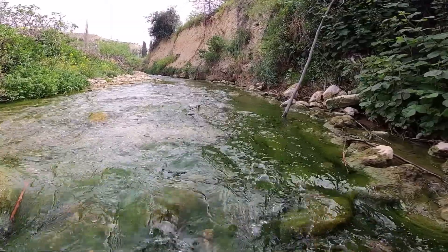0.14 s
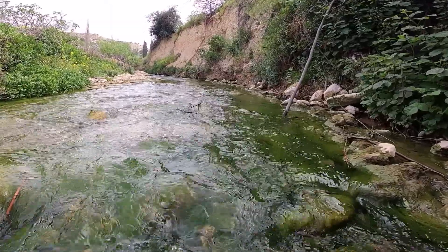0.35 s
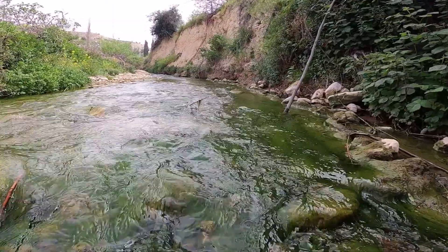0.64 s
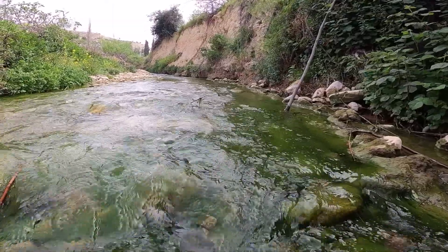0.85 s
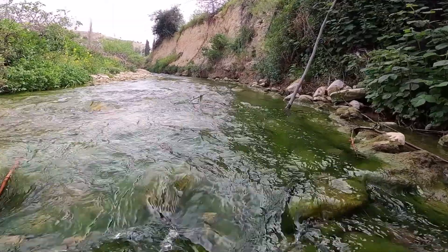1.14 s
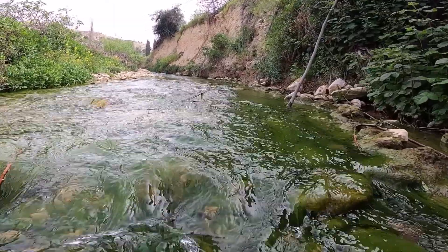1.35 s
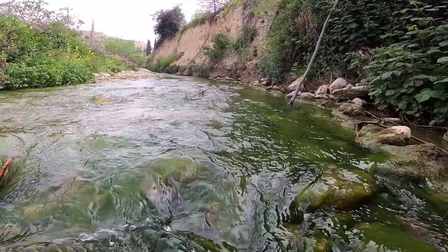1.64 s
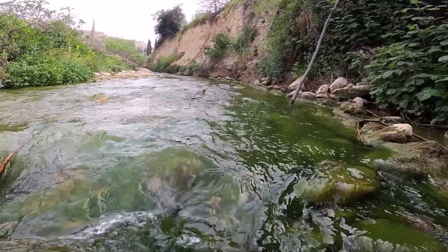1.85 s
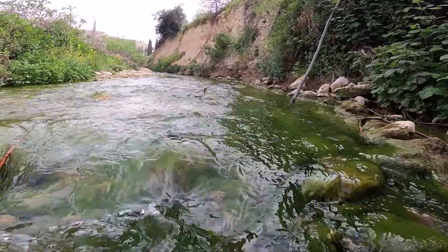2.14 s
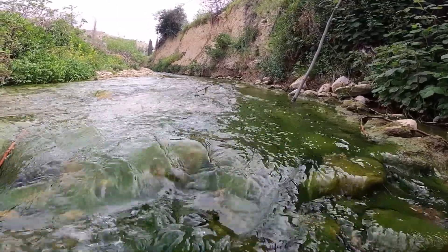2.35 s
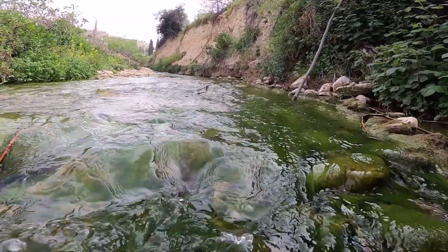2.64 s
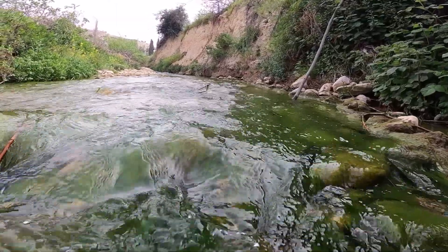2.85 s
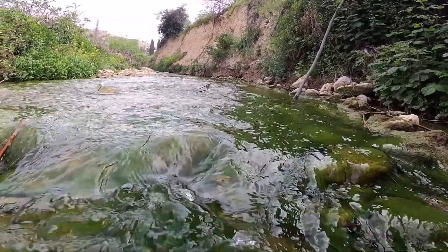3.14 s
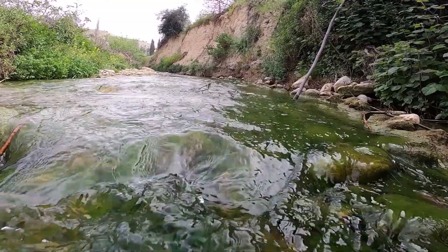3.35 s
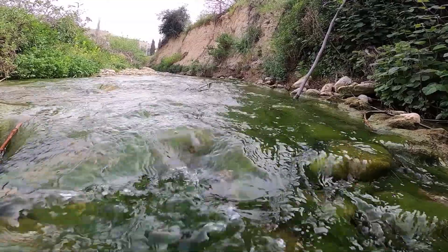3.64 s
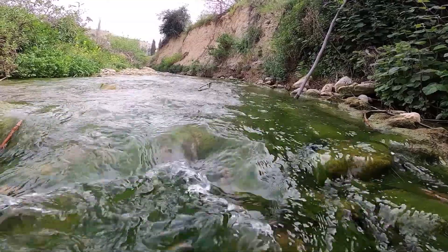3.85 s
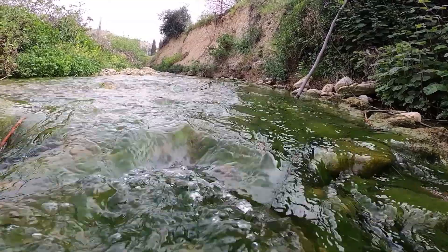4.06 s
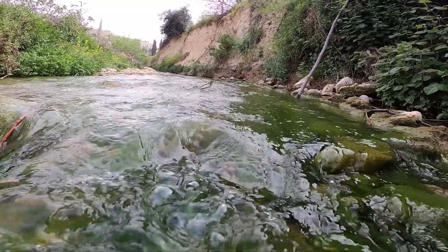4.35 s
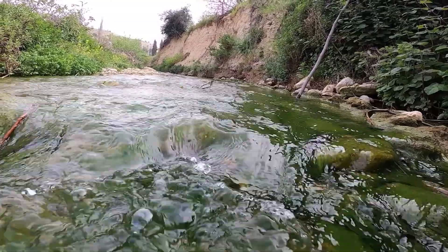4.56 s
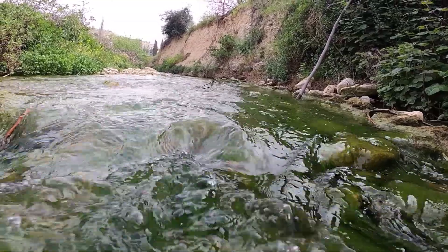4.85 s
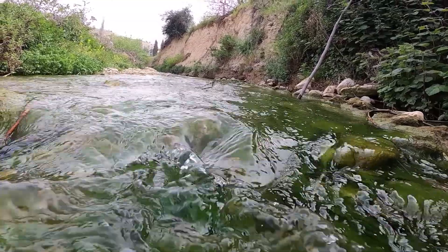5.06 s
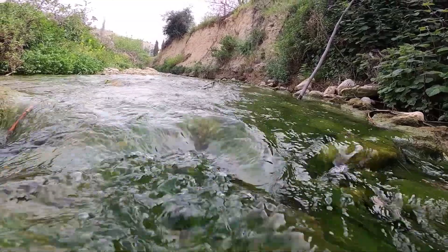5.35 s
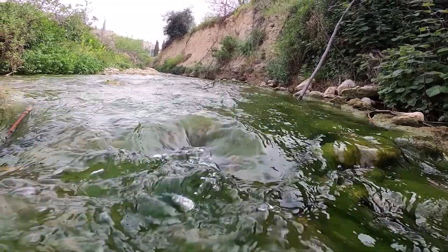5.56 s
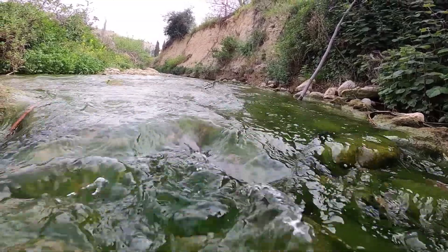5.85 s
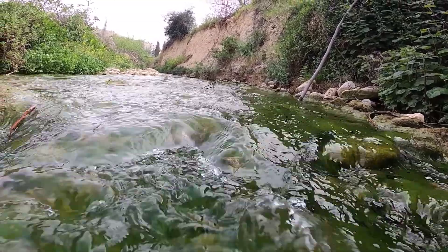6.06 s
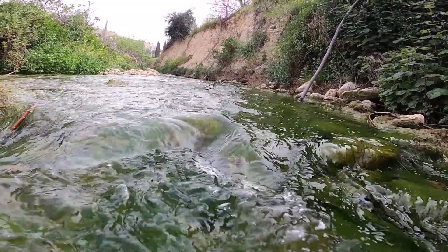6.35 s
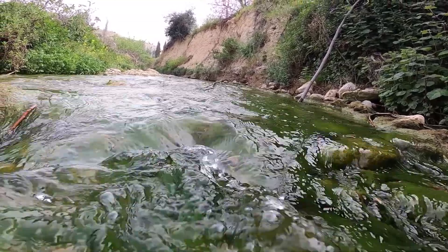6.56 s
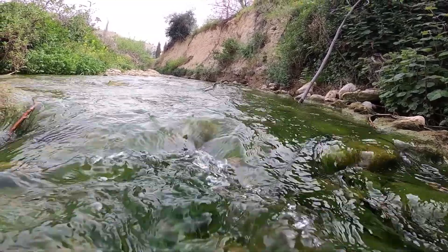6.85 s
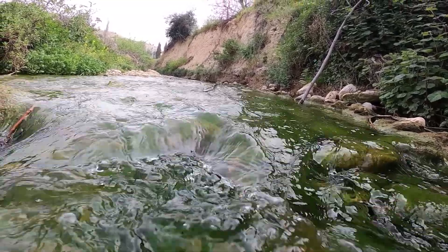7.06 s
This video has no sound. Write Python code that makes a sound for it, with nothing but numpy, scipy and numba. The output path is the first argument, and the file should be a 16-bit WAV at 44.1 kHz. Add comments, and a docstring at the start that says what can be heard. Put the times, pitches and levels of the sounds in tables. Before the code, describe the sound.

Close outdoor sound of a shallow stream rushing over stones, fizzing and bubbling. A frog opens at once with a dozen quick, bright, ratchety chirps. Three rattling croaks follow, the middle one longest, with soft wind thumps around them. After a pause of gurgling water, a slightly lower-pitched frog gives ten more chirps. Then only the stream remains, with plops and barely audible peeps. Stereo, frogs slightly right, very little echo.

```python
"""Beside a shallow stream that runs over stones under an earth bank, marsh frogs call.
Two bouts of sharp chirps, each a quick run of clicks into the vocal sacs, frame three rattling croaks
made of pulse trains that ring sacs and throat. The water is banded noise, ringing bubbles, fizz and drops;
faint gliding peeps, perhaps a far bird, come late, and gusts of low noise thump on the microphone."""
import sys
import numpy as np
from scipy import signal
from scipy.fft import rfft, irfft, next_fast_len
from scipy.io import wavfile
from scipy.ndimage import uniform_filter1d, minimum_filter1d
from numba import njit

SR = 44100
rng = np.random.default_rng(int(sys.argv[2]) if len(sys.argv) > 2 else 0)


def to_wav(s):
    """Save 16-bit WAV."""
    ch = np.atleast_2d(s).T  # columns
    pcm = np.round(np.clip(ch, -1, 1) * 32767)  # PCM
    wavfile.write(sys.argv[1], SR, pcm.astype(np.int16))


N = 318402
TIME = np.arange(N) / SR

# the stream's flow; the rush follows its rise and fall about the median:
# (time [s], rush [dB], spray before trim [dB])
FLOW = [(0.0, -46, -54), (.7, -45, -53), (1.4, -43, -53.5), (2.4, -39, -53), (3.3, -42, -49),
        (4.4, -39.5, -50), (5.1, -39.5, -51.5), (6.2, -42, -56.5), (7.22, -40, -55)]
RUSH_DB = -35.5   # rush and bubbles at median flow, before their own trims
# colour of the rush: (frequency [Hz], density [dB per Hz])
RUSH_COLOUR = [(35, -36), (60, -7.5), (118, -4.5), (206, 2.5), (272, -4.5), (453, -8), (657, -11),
               (976, -9.5), (1070, -7), (1630, -11), (1910, -9), (4850, -22.5), (7540, -23), (12600, -46.5),
               (15500, -55.5)]
# colour of the spray: (frequency [Hz], density [dB per Hz])
SPRAY_COLOUR = [(2000, -6.5), (3500, 6.5), (5000, 2.5), (7500, -0.5), (8400, -9.5), (9300, -8),
                (10200, -11.5), (12500, -13.5), (15500, -36.5)]
# stereo width of the rush: (frequency [Hz], side against mid [dB])
WIDTH = [(60, -15.5), (110, -29.5), (200, -21), (380, -11.5), (700, -9), (1290, -12.5), (2380, -9),
         (4400, -4.5), (8120, -2.5), (15000, 19.5)]
# colour of the wind: (frequency [Hz], density [dB per Hz])
WIND_COLOUR = [(12, -15.5), (20, 6), (50, 7), (90, -1), (225, -18.5), (264, -43), (296, -23), (323, -35.5),
               (400, -44.5), (880, -120)]
# gusts on the microphone: (centre time [s], length [s], level before trim [dB])
GUSTS = [(0.14, 0.24, -45), (0.653, 0.16, -41), (1.344, 0.12, -38), (1.419, 0.043, -20),
         (1.988, 0.11, -18.5), (2.078, 0.11, -31.5), (2.222, 0.042, -21), (2.373, 0.12, -21.5),
         (2.588, 0.038, -30), (2.785, 0.29, -34.5), (2.938, 0.065, -27), (3.053, 0.051, -23),
         (3.308, 0.17, -25.5), (3.48, 0.12, -30), (4.897, 0.14, -40.5), (6.82, 0.14, -30)]
# the light air between gusts, before trim
BREEZE_DB, BREEZE_SWING_DB, BREEZE_SWINGS_PER_S = -45, 2.5, 5.4

# chirps of the first frog: (time of the main click [s], last click spacing [s],
# level of the fifth-last click [dB], wait for the closing click [s], closing level [dB]);
# levels are against the main click, before the effort
FIRST_CHIRPS = [(.0423, .0051, -10, .012, -14), (.1136, .00495, -6, .0087, -5),
                (.1874, .0049, -6, .0076, -7), (.2598, .0052, -8, .0096, -9),
                (.3323, .00515, -7, .0104, -14), (.3995, .0048, -9, .0065, -3),
                (.4746, .0054, -5.5, .0114, -13), (.5439, .00505, -7, .0073, -2),
                (.6133, .00495, -8, .0062, -2), (.6873, .005, -8, .0065, -2),
                (.7604, .00515, -7, .0074, -4), (.8325, .0048, -3.5, .0062, -2)]
# chirps of the second frog: (time of the main click [s], last click spacing [s],
# level of the fifth-last click [dB], wait for the closing click [s], closing level [dB])
SECOND_CHIRPS = [(4.6005, .0039, -5, .0053, -2), (4.6627, .00475, -4, .0086, -3),
                 (4.7339, .00465, -5, .0079, -1), (4.8055, .00435, -9, .0052, -2),
                 (4.8801, .00485, -7.5, .0095, -6), (4.9557, .0049, -7.5, .0086, -5),
                 (5.0264, .00465, -10, .0062, -3), (5.1026, .00485, -9, .0081, -4),
                 (5.176, .0047, -10, .0059, -1), (5.2558, .00525, -5, .0162, -16)]
# lone clicks that end each bout: (time [s], level against a main click before the effort [dB])
FIRST_END = [(0.852, -9)]
SECOND_END = [(5.295, -19), (5.306, -16)]
# the sacs tighten through a bout and slacken at its end:
# (time [s], sac pitch [Hz], bandwidth [Hz], effort [dB])
FIRST_SAC = [(.04, 2630, 470, -1.5), (.26, 2830, 337, -0.5), (.47, 2895, 280, 0.5), (.62, 2915, 268, 0),
             (.76, 2930, 292, 1.5), (.83, 2580, 573, -1), (.85, 2380, 500, 1.5)]
SECOND_SAC = [(4.6, 2240, 210, -1), (4.66, 2340, 220, -1), (4.73, 2390, 190, 0.5), (4.86, 2586, 130, 1.5),
              (5.03, 2640, 125, 3), (5.1, 2640, 130, 2.5), (5.18, 2520, 200, 2.5), (5.26, 2360, 280, 2.5),
              (5.31, 2100, 170, 2.5)]
# other resonances of the chirping frogs: (frequency [Hz], bandwidth [Hz], level against the sac [dB])
FIRST_BODY = [(1365, 92, -33), (2055, 280, -19.5), (2590, 1030, -6), (3080, 415, -5), (3900, 110, -26),
              (4450, 140, -30.5), (4912, 126, -12.5), (5064, 185, -11)]
SECOND_BODY = [(697, 86, -27), (1260, 1100, -26.5), (1800, 630, -6.5), (2050, 210, -11.5),
               (2460, 560, -26.5), (4570, 460, -19), (5144, 170, -4.5)]
RING_S, CHOKE_S = 0.0055, 0.0011   # latest middle of the choke after a click, and the choke's length
FAINTEST_CLICK_DB = -24            # floor of the early clicks, before scatter and effort
TAUT_BRIGHT_DB_PER_HZ = 0.0076     # tighter sacs sound brighter
EARLY_BRIGHT_DB = 1.03             # per click: the early clicks of a chirp carry more treble

# wavelets that break on the stones: (centre time [s], length [s], level [dB])
SPLASHES = [(1.045, 0.041, -55), (1.18, .03, -58), (1.585, 0.055, -43), (1.69, .05, -46),
            (2.685, 0.063, -40.5), (2.75, 0.21, -40.5), (2.82, .12, -42)]
# colour of a splash: (frequency [Hz], density [dB per Hz])
SPLASH_COLOUR = [(800, -25), (2500, -0.5), (3800, 4.5), (5500, -2), (7600, -4.5), (9000, -7), (12000, -15),
                 (15000, -28)]
# drops that spit off the riffle: (time [s], peak before trim [dB], pitch [Hz])
DROPS = [(1.3224, -39, 9100), (1.596, -29, 4600), (1.598, -37, 9300), (2.224, -25, 5160),
         (2.614, -31, 4760), (2.707, -23, 4900), (2.715, -20, 4200), (2.721, -25, 3405),
         (3.1747, -33, 7300), (4.1894, -37, 4620), (4.408, -35, 4400), (4.719, -27, 5070),
         (6.4014, -36, 6960), (6.797, -20, 1800)]

# three croaks, each one train of pulses that surges with every push of air:
# (time [s], rate [pulses per s], level before trim [dB])
CROAKS = [
    [(1.76, 450, -44), (1.778, 466, -36.5), (1.815, 503, -26.5), (1.828, 510, -29), (1.838, 610, -25.5),
     (1.845, 470, -24), (1.857, 427, -27), (1.866, 550, -22), (1.877, 560, -19.5), (1.884, 345, -19),
     (1.893, 345, -21.5), (1.905, 397, -16.5), (1.917, 480, -9), (1.924, 430, -13), (1.931, 374, -19),
     (1.939, 303, -17.5), (1.95, 390, -9.5), (1.957, 310, -17.5), (1.97, 310, -23.5), (1.98, 330, -38)],
    [(2.148, 272, -35), (2.178, 285, -23.5), (2.198, 280, -23), (2.213, 237, -21.5), (2.235, 304, -22.5),
     (2.254, 220, -26), (2.274, 355, -21.5), (2.286, 270, -18.5), (2.296, 270, -26.5), (2.32, 335, -16),
     (2.331, 385, -20), (2.348, 300, -27.5), (2.363, 375, -16), (2.376, 295, -18.5), (2.39, 278, -28),
     (2.408, 377, -15.5), (2.43, 294, -21), (2.445, 362, -17), (2.457, 360, -6), (2.472, 270, -32),
     (2.486, 323, -10.5), (2.499, 286, -22), (2.505, 400, -15.5), (2.516, 230, -49)],
    [(2.82, 380, -36), (2.844, 385, -31), (2.857, 330, -26.5), (2.871, 350, -21.5), (2.888, 280, -32),
     (2.905, 364, -22.5), (2.915, 320, -27), (2.925, 250, -35), (2.937, 310, -28), (2.945, 340, -23),
     (2.955, 290, -24), (2.968, 217, -37), (2.98, 304, -22), (2.988, 356, -15.5), (2.997, 320, -21),
     (3.013, 245, -34), (3.026, 345, -19.5), (3.035, 370, -10.5), (3.046, 340, -17), (3.058, 285, -39)],
]
# the sacs slacken in the middle of each croak and fill again:
# (time [s], sac pitch [Hz], bandwidth [Hz], throat level [dB])
CROAK_SACS = [
    [(1.78, 1800, 160, 2), (1.82, 1968, 160, 2), (1.85, 1388, 300, 0), (1.88, 1630, 300, 1.5),
     (1.915, 1808, 101, -6), (1.95, 2007, 110, -6.5)],
    [(2.16, 2000, 120, -10), (2.205, 2090, 120, -9.5), (2.235, 1844, 220, -2), (2.26, 1400, 129, -4),
     (2.285, 1380, 150, -6), (2.305, 1674, 200, -10), (2.33, 1450, 280, -1), (2.37, 1403, 330, 2),
     (2.415, 1414, 250, 2), (2.447, 1814, 110, -3.5), (2.49, 1990, 110, -2)],
    [(2.83, 1598, 160, -1), (2.87, 1730, 120, -3), (2.905, 1390, 280, 1), (2.945, 1000, 380, 1),
     (2.99, 1430, 280, 0), (3.036, 1780, 160, -1)],
]
# throat of the croaking frog: (frequency [Hz], bandwidth [Hz], level against the sac before throat level [dB])
THROAT = [(580, 165, -10), (1017, 190, -10.5), (1452, 57, -17), (1890, 50, -17), (2160, 480, -39),
          (2780, 600, -21.5)]
# thin upper resonances that swell and glide over the croaks:
# (bandwidth [Hz], glide of (time [s], frequency [Hz], level against the voice [dB]))
OVERTONES = [(330, [(2.15, 3930, -25), (2.235, 3950, -16), (2.29, 4230, -17), (2.32, 4100, -10),
             (2.365, 4000, -10), (2.42, 4100, -14), (2.44, 4100, -45)]), (120, [(2.33, 5500, -40),
             (2.36, 5350, -28), (2.41, 5140, -25), (2.45, 5000, -36), (2.5, 4850, -33)]),
             (100, [(2.99, 4920, -36), (3.015, 4990, -14), (3.035, 4930, -22), (3.05, 4830, -30)])]
# added unevenness of the pulse rate while the sacs are slack, one per croak: (share of the rate [1])
SLACK_JITTERS = [.028, .045, .012]
# rasp while the sacs are slack, one per croak: (level against the voice [dB])
SLACK_RASPS_DB = [-21, -17, -23.5]
TAUT_RASP_DB = -22
TAUT_HZ, SLACK_HZ = 1696, 1670             # taut sacs sound pure, slack ones rough
RASP_HZ, RASP_WIDTH_HZ = 2720, 630         # the edge of each pulse
TAUT_FLUTTER, SLACK_FLUTTER = .015, .028   # turbulence that trails each pulse

# glugs and plops: (time [s], peak before trim [dB], starting pitch [Hz])
GURGLES = [(3.513, -25, 1120), (3.58, -30.5, 172), (3.621, -28.5, 980), (3.722, -25.5, 2200),
           (3.834, -24.5, 2360), (3.88, -27.5, 198), (3.934, -27.5, 940), (4.031, -28, 200),
           (4.385, -21.5, 2050), (4.468, -29, 162), (4.918, -19, 2060), (5.69, -30.5, 317),
           (5.941, -31, 980), (6.0, -31, 362), (6.025, -29, 1400), (6.055, -27.5, 775), (6.276, -32, 666),
           (6.561, -27, 174), (6.563, -27, 1270), (6.659, -30, 167), (6.849, -22.5, 1380),
           (7.105, -31, 185)]
# faint peeps, perhaps a far bird:
# (centre time [s], length at half height [s], peak [dB], centre pitch [Hz], glide [Hz per s])
PEEPS = [(5.855, .025, -48, 3320, 5996), (5.892, 0.011, -35.5, 2600, 0), (6.112, 0.027, -40, 2890, -12000)]
# echoes off water, stones and bank: (delay [s], level [dB])
ECHOES = [(.0023, -14.5), (.0038, -21.5), (.0093, -24)]


def from_db(db):
    """Decibels to gain."""
    return 10 ** (np.asarray(db) / 20)


def rms_one(x):
    """Scale to unit power."""
    return x / np.sqrt(np.mean(x ** 2) + 1e-20)


def in_time(rows):
    """The columns of a curve at every sample."""
    s, *columns = np.transpose(rows)
    return [np.interp(TIME, s, c) for c in columns]


def at_hz(points, hz):
    """Read a spectrum on a log-frequency axis."""
    f, values = np.transpose(points)
    return np.interp(np.log(hz + 1e-3), np.log(f + 1e-3), values)


def drift(rate):
    """Slow chance with spread 1, at about this many swings per second."""
    knots = rng.standard_normal(int(N / SR * rate * 2) + 2)
    return rms_one(np.interp(TIME * rate * 2, np.arange(len(knots)), knots))


def cut(x, hz, kind, order=2):
    """Butterworth filter."""
    sos = signal.butter(order, np.minimum(hz, .45 * SR), kind, fs=SR, output="sos")
    return signal.sosfilt(sos, x)


def coloured(x, spectrum):
    """Give a noise a spectrum; rms 1."""
    size = next_fast_len(N)
    gain = from_db(at_hz(spectrum, np.fft.rfftfreq(size, 1 / SR)))
    return rms_one(irfft(rfft(x, size) * gain, size)[..., :N])


def add(track, s, sound):
    """Mix a sound into a track from time s on."""
    at = round(s * SR)
    part = sound[max(-at, 0):N - at]
    track[max(at, 0):max(at, 0) + len(part)] += part


def swells(rows):
    """Gain of bell-shaped swells, given as (centre time [s], length [s], level [dB])."""
    return sum(from_db(db) * np.exp(-(2 * (TIME - s) / length) ** 2) for s, length, db in rows)


def ring(clicks, hz, width_hz):
    """A resonance: a unit click starts a dying wave of height 1."""
    r, w = np.exp(-np.pi * abs(width_hz) / SR), 2 * np.pi * hz / SR
    return signal.lfilter([.5, 0, -.5], [1, -2 * r * np.cos(w), r * r], clicks + 1e-18)


@njit
def gliding_ring(clicks, hz, width_hz):
    """A resonance whose pitch and width move from sample to sample."""
    out, state = np.zeros(len(clicks)), 0j
    for i in range(len(clicks)):
        state = state * np.exp(np.pi * (2j * hz[i] - abs(width_hz[i])) / SR) + clicks[i]
        out[i] = state.real
    return out


def evened(x, size=260):
    """Hold a pulsed sound near rms 1 over a few pulses."""
    power = uniform_filter1d(uniform_filter1d(x ** 2, size=size), size=size)
    return x / np.sqrt(np.abs(power) + 1e-6)


def rush(patchy_db=1.3, count=20):
    """Countless far bubbles merge into bands of noise that flicker each on its own."""
    out, edges = 0, np.geomspace(90, 15500, count + 1)
    white = rng.standard_normal((2, 2, N))
    for k, (low, high) in enumerate(zip(edges, edges[1:])):
        mid, side = cut(white[k % 2], [low, high], "band")
        hz = np.sqrt(low * high)
        gain = from_db(at_hz(RUSH_COLOUR, hz) + patchy_db * drift(14))
        out = out + gain * (mid + from_db(at_hz(WIDTH, hz)) * side * [[1], [-1]])
    return out / np.std(out.mean(axis=0))


def bubbles(low_hz=170, high_hz=3200, cycles=20, rise=.1, spread_db=2.7, swell_db=2.6, count=2800):
    """Near bubbles ring for some cycles and rise in pitch as they reach the surface; they come in swells."""
    out = np.zeros((2, N))
    for when, size, strength, where in rng.random((count, 4)):
        hz = low_hz * (high_hz / low_hz) ** np.sqrt(size)
        age = np.arange(0, 1, hz / (cycles * SR))   # 0 at birth, 1 when 60 dB down
        level_db = spread_db * min(-np.log(strength + 1e-9), 4) + at_hz(RUSH_COLOUR, hz)
        height = from_db(level_db) * np.sqrt(hz)
        wave = height * from_db(-60 * age) * np.sin(2 * np.pi * cycles * age * (1 + rise * age))
        add(out[0], when * N / SR + (where - .5) * 0.00037, wave)   # a small lag sets its place
        add(out[1], when * N / SR, wave)
    return rms_one(out * from_db(swell_db * drift(5)))


def spray(per_s, grain_db, hiss):
    """Tiny bursting bubbles fizz over the riffle: random grains and hiss, partly shared between sides."""
    sizes = from_db(grain_db * np.minimum(rng.exponential(1, (2, N)), 4))
    grains = (rng.random((2, N)) < per_s / SR) * sizes
    fizz = rms_one(grains * rng.choice([-1, 1], (2, N))) + hiss * rng.standard_normal((2, N))
    return coloured(fizz + 0.34 * fizz[::-1], SPRAY_COLOUR)


def stream(rush_db=-1.5, bubble_db=-5, spray_db=-1, surge=0.7, spray_swing_db=1.0):
    """Rush and bubbles swell together with the flow; spray and splashes come and go above them."""
    flow_db, fizz_db = in_time(FLOW)
    water = from_db(rush_db) * rush() + from_db(bubble_db) * bubbles()
    water = cut(water, 6170, "low") * from_db(RUSH_DB + surge * (flow_db - np.median(flow_db)))
    fizz_gain = from_db(fizz_db + spray_db + spray_swing_db * drift(9))
    fizz = fizz_gain * spray(per_s=1500, grain_db=4.0, hiss=1.0)
    return water + fizz + splashes() + drops() + gurgles()


def wind(shared=.08, pan_db=1.0, level_db=2.2):
    """Eddies buffet each port, partly on their own; gusts swell and die over a restless breeze."""
    eddies = rng.standard_normal((2, N))
    rumble = cut(coloured(eddies + shared * eddies[::-1], WIND_COLOUR), 550, "low", order=4)
    power = uniform_filter1d(np.mean(rumble ** 2, axis=0), size=4000)
    steady = rumble / np.sqrt(np.abs(power) + 1e-9)
    breeze = from_db(BREEZE_DB + BREEZE_SWING_DB * drift(BREEZE_SWINGS_PER_S))
    return steady * (breeze + swells(GUSTS)) * from_db(level_db) * from_db([[pan_db], [0]])


def chirps(notes, ends, sac, body, tighten, top_hz, swell, count=9):
    """Clicks that swell and slow down, then a late closing click, ring a sac that is choked each time."""
    out, unit = np.zeros(N), signal.unit_impulse(SR // 100)
    back = np.arange(count)   # clicks counted back from the main one
    age = TIME[:len(unit)]
    # neighbouring modes swing against each other, so a click takes a cycle or two to build up
    modes = np.array([(-1) ** k * from_db(db) * ring(unit, hz, w) for k, (hz, w, db) in enumerate(body)])
    high = np.array(body)[:, 0] > 4300
    low_modes, high_modes = modes[~high].sum(axis=0), modes[high].sum(axis=0)
    sac_s, sac_hz, sac_width, effort_db = np.transpose(sac)

    clicks = [(s, db, 0, RING_S) for s, db in ends]
    for s, spacing, lead_db, wait, closing_db in notes:
        gaps = spacing * (1 + back) ** -tighten * rng.normal(1, .012, count)
        levels = np.maximum(lead_db * (back / 4) ** swell, FAINTEST_CLICK_DB) + rng.normal(0, .5, count)
        times = s - np.cumsum(gaps) + gaps
        clicks += [*zip(times, levels, back, [wait, *gaps])]
        clicks.append((s + wait, closing_db, 0, RING_S))

    for s, db, early, until_next in clicks:
        hz = np.interp(s, sac_s, sac_hz) * rng.normal(1, .008)
        still_open = np.clip((min(until_next, RING_S) - age) / CHOKE_S + .5, 0, 1)
        choke = np.sin(np.pi / 2 * still_open) ** 2
        treble_db = EARLY_BRIGHT_DB * (early - 5.5) + TAUT_BRIGHT_DB_PER_HZ * (hz - sac_hz.mean())
        sac_ring = ring(unit, hz, np.interp(s, sac_s, sac_width))
        click = choke * (sac_ring + low_modes + from_db(treble_db) * high_modes)
        add(out, s, from_db(db + np.interp(s, sac_s, effort_db)) * click)
    return cut(cut(out, top_hz, "low", order=18), 190, "high")


def splashes(per_s=650, grain_db=3.0, cycles=12, count=16):
    """Wavelets break on the stones into a shower of tiny bubbles that ring at a spread of pitches."""
    shower = 0
    for hz in np.geomspace(2500, 12500, count):
        born = rng.random(N) < per_s / SR
        sizes = np.zeros(N)
        sizes[born] = from_db(grain_db * np.minimum(rng.exponential(1, born.sum()), 3))
        side_gains = from_db(rng.normal(0, 4.7, (2, 1)))
        shower = shower + ring(sizes, hz, hz / cycles) * side_gains
    return coloured(shower, SPLASH_COLOUR) * swells(SPLASHES)


def drops(width_share=0.31, level_db=-2):
    """Single droplets tick on the surface: a noise burst rings twice around each one's own pitch."""
    out, t = np.zeros(N), TIME[:SR // 20]
    for s, peak_db, hz in DROPS:
        burst = rng.standard_normal(len(t)) * np.exp(-t / .002)
        tick = ring(ring(burst, hz, width_share * hz), hz, width_share * hz)
        add(out, s, from_db(peak_db + level_db) * tick / np.abs(tick).max())
    return out


def croak(curve, sac, slack_jitter, slack_rasp_db, jitter=0.0069, shimmer=0.28, top_hz=2170):
    """Pulses ring the sacs and throat: pure while the sacs are taut, rattling and raspy while slack."""
    s, rates, levels_db = np.transpose(curve)
    t = np.arange(s[0], s[-1], 1 / SR)
    sac_s, *columns = np.transpose(sac)
    sac_hz, sac_width, throat_db = (np.interp(t, sac_s, c) for c in columns)
    slack = np.clip((TAUT_HZ - sac_hz) / (TAUT_HZ - SLACK_HZ), 0, 1)   # 0 taut, 1 slack

    unevenness = (jitter + slack_jitter * slack) * drift(150)[:len(t)]
    cycles = np.cumsum(np.interp(t, s, rates) * (1 + unevenness)) / SR
    pulses = np.diff(np.floor(cycles), prepend=-1) * (1 + shimmer * rng.standard_normal(N)[:len(t)])
    turbulence = signal.lfilter([1], [1, -.97], pulses) * rng.standard_normal(N)[:len(t)]
    pulses = pulses + (TAUT_FLUTTER + slack * (SLACK_FLUTTER - TAUT_FLUTTER)) * turbulence

    throat = sum(from_db(db) * ring(pulses, hz, w) for hz, w, db in THROAT)
    voice = gliding_ring(pulses, sac_hz, sac_width) + from_db(throat_db) * throat
    voice = cut(cut(voice, top_hz, "low", order=16), 545, "high", order=7)
    rasp = ring(pulses, RASP_HZ, RASP_WIDTH_HZ)
    rasp = cut(cut(rasp, 2200, "high", order=8), 5500, "low", order=4)
    rasp_db = TAUT_RASP_DB + slack * (slack_rasp_db - TAUT_RASP_DB)
    out = evened(voice) + from_db(rasp_db) * evened(rasp)

    for width_hz, glide in OVERTONES:
        when, hz, db = np.transpose(glide)
        hz, width = np.interp(t, when, hz), np.full(len(t), width_hz)
        overtone = gliding_ring(gliding_ring(pulses, hz, width), hz, width)
        gain = from_db(np.interp(t, when, db, left=-np.inf, right=-np.inf))   # silent outside its glide
        out = out + gain * evened(overtone)
    track = np.zeros(N)
    add(track, s[0], out * from_db(np.interp(t, s, levels_db)))
    return track


def gurgles(cycles=22, rise=0.043, level_db=-2.0):
    """Air pockets glug and plop under the standing wave, rising a little in pitch."""
    out = np.zeros(N)
    for s, peak_db, hz in GURGLES:
        age = np.arange(0, 1, hz / (cycles * SR))
        swell = (1 - np.exp(-15 * age)) * from_db(-60 * age)
        wave = np.sin(2 * np.pi * cycles * age * (1 + rise * age))
        add(out, s, from_db(peak_db + level_db) * swell / swell.max() * wave)
    return out


def peeps():
    """Short gliding whistles that barely rise out of the rush."""
    out = np.zeros(N)
    for s, length, peak_db, hz, glide in PEEPS:
        t = np.arange(-length, length, 1 / SR)
        whistle = np.sin(2 * np.pi * (hz + glide * t / 2) * t)
        add(out, s - length, from_db(peak_db) * np.hanning(len(t)) * whistle)
    return out


def placed(x, lag_ms, pan_db):
    """A source on the right reaches the left port later and weaker."""
    left = np.interp(TIME - lag_ms / 1000, TIME, x) * from_db(-pan_db / 2)
    return np.array([left, x * from_db(pan_db / 2)])


def banks(x, tail_db, t60):
    """A few short echoes and a faint scatter from the bushes, which dies 60 dB in t60 seconds."""
    t = TIME[:SR // 2]
    scatter = rng.standard_normal((2, len(t))) * from_db(-60 * t / t60)
    scatter = scatter / np.sqrt(np.sum(scatter ** 2) / 2)
    echoes = 0
    for delay, db in ECHOES:
        echoes = echoes + from_db(db) * np.array([np.interp(TIME - delay, TIME, side, left=0) for side in x])
    return x + echoes + from_db(tail_db) * signal.fftconvolve(x, scatter, axes=1)[:, :N]


def scene():
    """Three frogs a little to the right, the stream all around and louder on the left, wind at the microphone."""
    first = chirps(FIRST_CHIRPS, FIRST_END, FIRST_SAC, FIRST_BODY, tighten=0.21, top_hz=5060, swell=2.3)
    second = chirps(SECOND_CHIRPS, SECOND_END, SECOND_SAC, SECOND_BODY, tighten=.19, top_hz=4820, swell=2.2)
    chirpers = placed(from_db(2.0) * first, lag_ms=0.057, pan_db=1.1)
    chirpers = chirpers + placed(from_db(-1) * second, lag_ms=0.071, pan_db=1.0)
    calls = zip(CROAKS, CROAK_SACS, SLACK_JITTERS, SLACK_RASPS_DB)
    croaks = from_db(2.0) * sum(croak(*call) for call in calls)
    croaker = placed(croaks, lag_ms=0.074, pan_db=2.15)
    frogs = banks(chirpers, tail_db=-12, t60=0.15) + banks(croaker, tail_db=-12.0, t60=0.077)
    return frogs + peeps() + stream() * from_db([[.7], [-.7]]) + wind()


def record(dry, release_db_per_s=9, ceiling_db=-1.7, stop_hz=16300):
    """A limiter ducks ahead of each peak and recovers slowly, so the stream sinks behind the calls; top cut."""
    over_db = np.maximum(20 * np.log10(np.abs(dry).max(axis=0) + 1e-9) - ceiling_db, 0)
    held_db = np.maximum.accumulate(over_db + release_db_per_s * TIME) - release_db_per_s * TIME
    gain_db = uniform_filter1d(minimum_filter1d(-held_db, size=180), size=180)
    top_cut = signal.cheby2(14, 70, stop_hz, fs=SR, output="sos")   # 70 dB down from stop_hz up
    return signal.sosfilt(top_cut, dry * from_db(gain_db))


dry = scene()
out = record(dry)
to_wav(out)
```